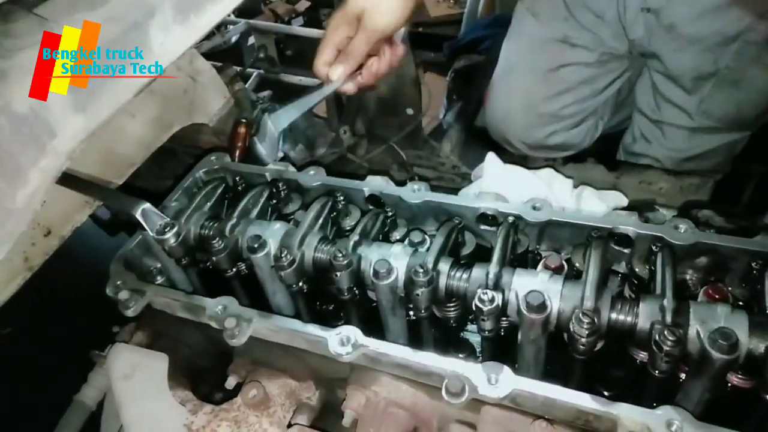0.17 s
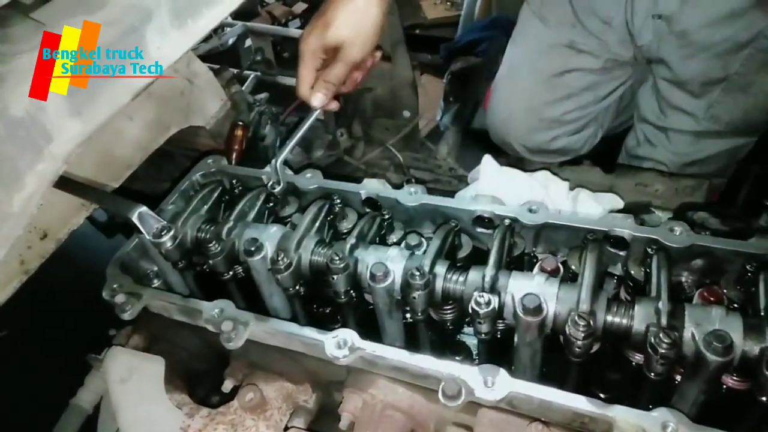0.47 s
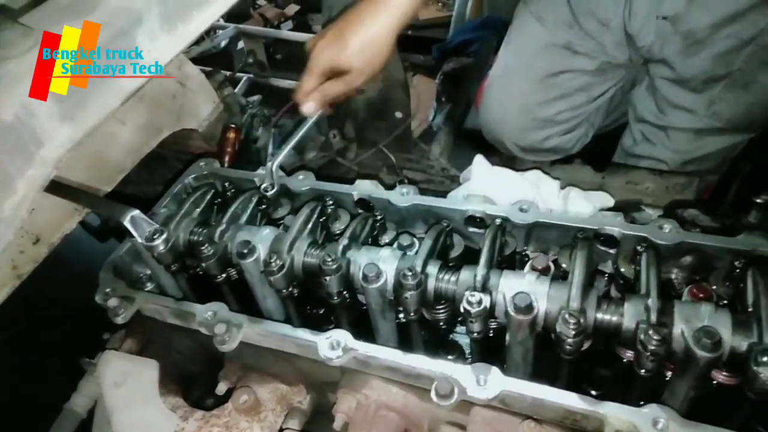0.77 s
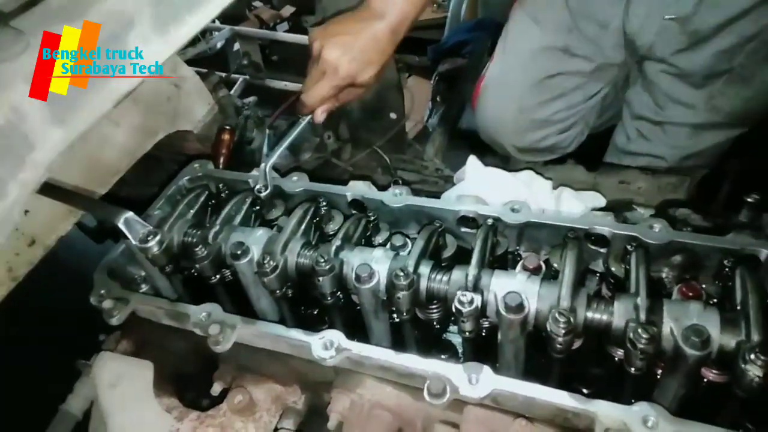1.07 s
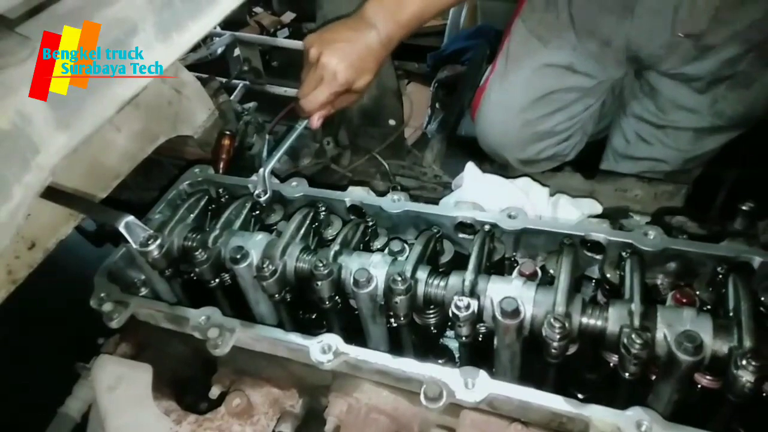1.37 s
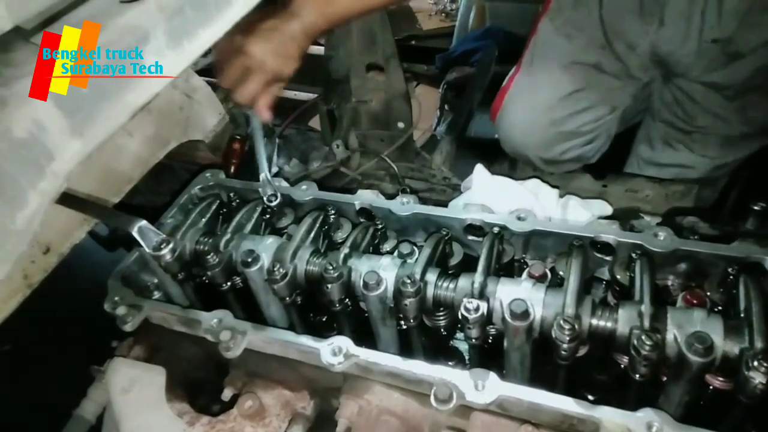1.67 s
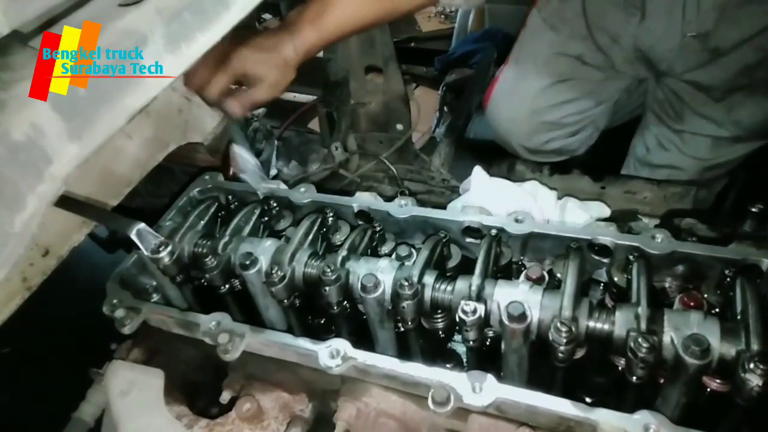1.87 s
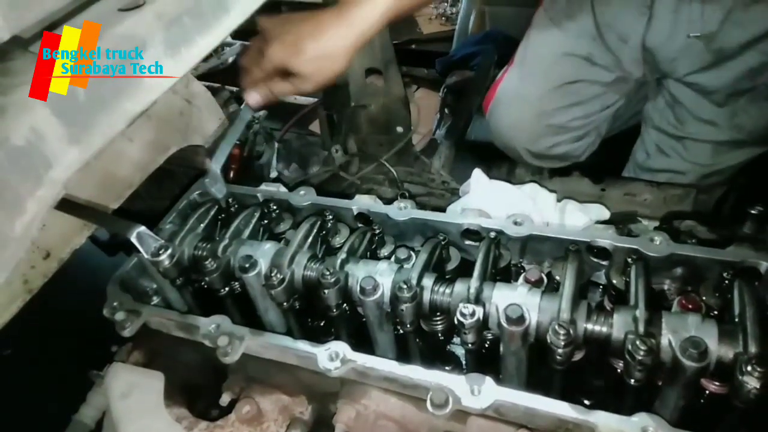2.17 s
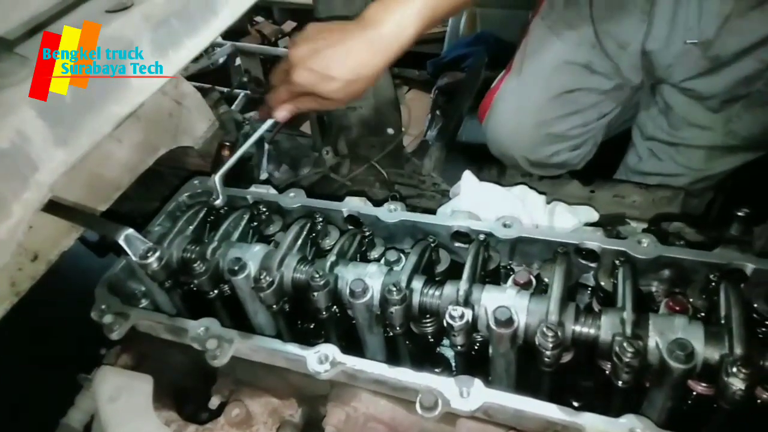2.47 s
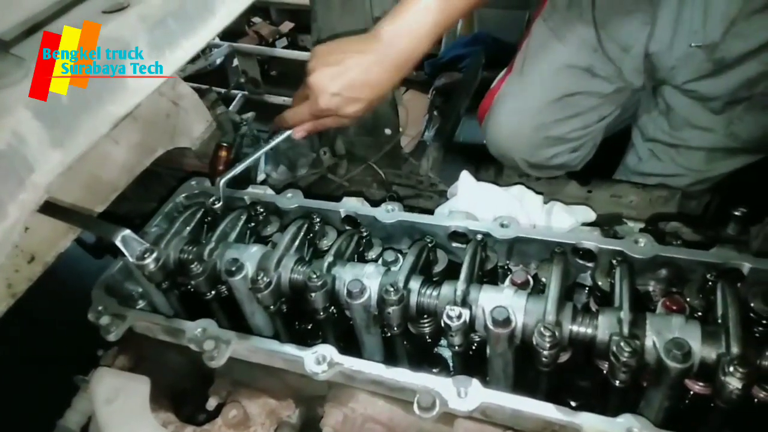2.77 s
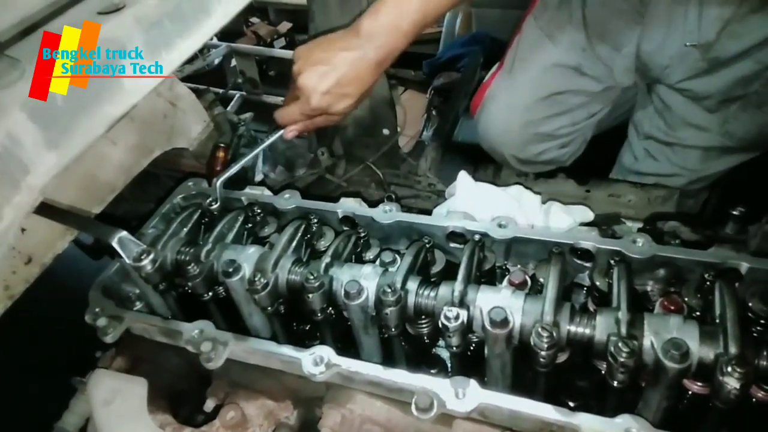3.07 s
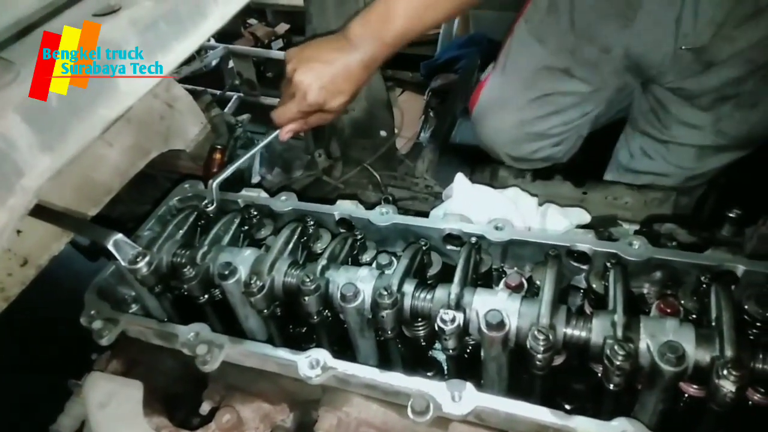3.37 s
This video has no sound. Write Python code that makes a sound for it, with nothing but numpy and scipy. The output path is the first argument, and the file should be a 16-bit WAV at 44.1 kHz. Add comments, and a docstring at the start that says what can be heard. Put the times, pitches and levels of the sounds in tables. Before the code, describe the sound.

Light metal clinks of a wrench on an engine, with machinery humming and hissing behind.

```python
"""From the start a workshop machine runs at a steady speed, with the same rattle every turn and a gear
whine, over a mains hum, a low hum that swells and fades, and a broad hiss of air and traffic.
At 0.4 s a steel wrench is set on the nuts of a stopped engine and clinks: wrench and engine block ring.
Near 1 s it takes the load with a dull knock, and a nut squeaks faintly as it gives.
A deeper hum comes in at 1.75 s and dies away; from 2.3 s the wrench clinks again."""
import sys
import numpy as np
from scipy import signal
from scipy.fft import rfft, irfft
from scipy.io import wavfile

SR = 44100
rng = np.random.default_rng(int(sys.argv[2]) if len(sys.argv) > 2 else 0)


def dump(signal):
    """Clip the signal to [-1, 1] and save it as 16-bit WAV at the path in sys.argv[1]."""
    limited = np.clip(np.atleast_2d(signal).T, -1, 1)
    pcm = np.round(limited * 32767).astype(np.int16)
    wavfile.write(sys.argv[1], SR, pcm)


N = 155232

# Typical strength of the rattle's overtones (multiples of the turn rate): (frequency [Hz], level [dB])
RATTLE_SPECTRUM = [(25, -64.5), (110, -68), (220, -66), (350, -69), (430, -85.5), (560, -62.5), (700, -72),
                   (860, -64.5), (1100, -74), (1350, -67), (1700, -102), (2700, -84.5), (3500, -82),
                   (4200, -81.5), (4900, -80), (6700, -103), (8500, -101), (11000, -115)]
# Overtones that stand out as clear tones: {multiple of the turn rate: level [dB]}
MACHINE_TONES = {2: -61, 3: -62, 23: -65, 39: -55, 40: -61, 47: -62, 61: -63, 62: -61, 73: -56, 74: -53.5,
                 75: -60, 79: -64, 84: -63, 90: -64, 246: -75, 253: -74, 263: -76, 268: -75, 306: -74, 318:
                 -76, 344: -77, 352: -78, 359: -76, 374: -76}
# The low hum that swells and fades: (time [s], frequency [Hz], level [dB])
SWELL_PATH = [(0, 104, -50), (.03, 104.5, -45), (.15, 103.2, -58), (.58, 98.2, -66), (.72, 93.6, -44.5),
              (1.1, 100.6, -47), (1.4, 92.1, -52), (1.48, 94.5, -59), (1.66, 102.5, -47), (1.74, 97.9, -50),
              (1.82, 94, -52), (1.95, 96.6, -60)]
# The mains hum and three higher steady tones: (frequency [Hz], level [dB])
HUM_TONES = [(60, -52), (209.6, -63), (495.6, -64), (1394.6, -62)]
# The hiss from bass to treble: (frequency [Hz], level [dB per Hz])
HISS_SPECTRUM = [(20, -68), (45, -79), (70, -71), (130, -74), (200, -73.5), (330, -83), (480, -77.5),
                 (690, -79), (880, -76.5), (1080, -76), (1400, -80.5), (1700, -83.5), (2200, -82.5),
                 (2700, -91), (4300, -94.5), (6700, -93.5), (8500, -103), (10600, -105), (13400, -104.5),
                 (15500, -100)]
# How the bass of the hiss rises and falls: (time [s], gain [dB])
HISS_BASS_GAIN = [(0, 1.5), (.4, -1.5), (1.0, -1.5), (1.8, 0), (2.6, -2), (3.5, -2)]
# One row a clink: (time [s], overall gain [dB], 2 gains for the block's groups of notes [dB],
# 9 gains for the wrench's groups [dB], time the wrench rings freely [s], gain of the crack [dB])
CLINK_BLOWS = [(0.4082, -30, -13, -9.5, -16, -16, -18, -22, -17, -26, -24, -17, -22, 0.02, -5),
               (0.4135, -28, -20, -16, -15.5, -17, -18, -28, -22, -26, -26, -14, -19, 0.016, -12),
               (0.4352, -33.5, -15, -16, -7.5, -19, -14, -20, -21, -30, -20, -26, -22, 0.0065, -16),
               (0.4424, -35.5, -18, -10, -5.5, -18, -20, -24, -21, -30, -13, -26, -22, 0.0078, -22),
               (0.4674, -38, 3, -13, -18, -17, -22, -26, -24, -28, -24, -21, -15, 0.021, -16),
               (0.4944, -44, -17, -7, -14, -9, -28, -28, -28, -28, -26, -23, -25, 0.012, -18),
               (0.6646, -38, -2, -12, -11, -12, -16, -10, -24, -12, -15, -10, -14, 0.011, -10),
               (2.3086, -35.5, 1, -5, -12.5, -21, -30, -32, -15, -30, -32, -26, -16, 0.018, -8.5),
               (2.3714, -29, -12, -9.5, -15, -20, -15, -30, -29, -28, -26, -11, -20, 0.012, -12),
               (2.3834, -38, -4, -3, -12, -14, -22, -26, -22, -24, -26, -22, -8, 0.019, -12),
               (2.577, -33, -7.5, -19, -15, -11, -26, -30, -28, -19, -24, -28, -8, 0.0058, -10),
               (2.586, -38.5, -4, -12, -16, -9, -26, -30, -28, -20, -24, -26, -16, 0.0083, -12)]
# Notes the engine block rings at, a low and a high group: (frequency [Hz], gain [dB], ring time [s])
BLOCK_NOTES = [
    [(1250, -7, .025), (1450, -6, .025), (1700, -6, .02), (1950, -5, .02), (2330, -4, .022)],
    [(2710, -4, .035), (3000, -6, .02), (3270, -4, .04), (3480, -5, .03), (3800, -3, .045),
     (4150, -5, .015), (5000, -6, .02), (5300, -6, .015)],
]
# Notes the wrench rings at, in nine groups from low to high: (frequency [Hz], gain [dB], ring time [s])
WRENCH_NOTES = [
    [(6335, -1, .11), (6490, -3, .11)],
    [(5820, -2, .09), (6690, -3, .05), (6890, -1, .05), (7200, -5, .04)],
    [(9085, -1, .1), (8460, -8, .05)],
    [(9680, -1, .06)],
    [(11650, -1, .11)],
    [(12050, -1, .06)],
    [(13440, -1, .05)],
    [(14080, -1, .09)],
    [(15380, -1, .08)],
]
# Notes of the dull knock: (frequency [Hz], gain [dB], ring time [s])
KNOCK_NOTES = [(720, -6, .05), (1050, -1, .04), (1650, -4, .03), (2150, -6, .03)]
# The squeak's three gliding tones, a list for each: (time [s], frequency [Hz], level of a strand [dB])
SQUEAK_PATHS = [
    [(1.05, 13800, -88), (1.065, 14150, -70), (1.1, 14950, -73), (1.14, 15300, -71), (1.2, 15300, -88),
     (1.25, 14550, -71), (1.29, 15200, -75), (1.33, 15000, -75), (1.36, 14100, -72), (1.39, 13550, -70),
     (1.41, 12400, -68), (1.42, 12100, -90)],
    [(1.06, 12900, -90), (1.11, 13150, -78), (1.16, 13300, -73), (1.185, 13900, -75), (1.23, 13650, -72),
     (1.27, 13400, -76), (1.3, 14000, -80), (1.335, 14300, -71), (1.36, 13200, -74), (1.395, 12350, -72),
     (1.41, 12200, -90)],
    [(1.21, 10500, -92), (1.226, 10450, -68), (1.245, 10350, -72), (1.26, 10200, -88), (1.29, 10150, -76),
     (1.325, 10750, -75), (1.36, 10600, -88)],
]

TURN_HZ, CUTOFF_HZ = 13.918, 15520   # machine turns per second; top edge of the treble


def from_db(db):
    """Turn decibels into a number to multiply by."""
    return 10 ** (np.asarray(db, float) / 20)


def level_at(spectrum, hz):
    """Read the level in dB between a spectrum's points, on a log-frequency axis."""
    points_hz, points_db = np.transpose(spectrum)
    return np.interp(np.log(hz + 1), np.log(points_hz), points_db)


def drift(rate_hz):
    """A smooth random wobble, about 1 in size; a higher rate wobbles faster."""
    step, warm_up = 40, 4000   # one random value every 40 samples
    pole = np.exp(-2 * np.pi * step * rate_hz / SR)
    noise = rng.standard_normal(N // step + warm_up + 2)
    slow = signal.lfilter([1], [1, -2 * pole, pole * pole], noise)[warm_up:]
    return np.interp(np.arange(N) / step, np.arange(len(slow)), slow / np.sqrt(np.mean(slow ** 2)))


def tone(hz, db):
    """A sine wave at an average (rms) level; pitch and level may move."""
    cycles = rng.random() + np.cumsum(hz * np.ones(N)) / SR
    return np.sqrt(2) * from_db(db) * np.sin(2 * np.pi * cycles)


def ring(clicks, hz, ring_s):
    """Each click starts a note that fades by 60 dB over its ring time."""
    decay, angle = from_db(-60 / (ring_s * SR)), 2 * np.pi * hz / SR
    return signal.lfilter([0, np.sin(angle)], [1, -2 * decay * np.cos(angle), decay ** 2], clicks + 1e-18)


def machine(size=2 ** 15, wander_s=.00002):
    """A machine repeats one turn of random rattle, almost in strict time; its gears whine along."""
    multiples = np.arange(size // 2 + 1)
    hz = multiples * TURN_HZ
    overtones = from_db(level_at(RATTLE_SPECTRUM, hz)) * np.sqrt(rng.exponential(1, len(hz)))
    overtones *= (hz > 0) & (hz < CUTOFF_HZ)
    overtones[list(MACHINE_TONES)] = from_db(list(MACHINE_TONES.values()))
    one_turn = irfft(overtones * np.exp(2j * np.pi * rng.random(len(hz)))) * size / np.sqrt(2)
    turns = (np.arange(N) / SR + wander_s * drift(2.1)) * TURN_HZ
    return np.interp(turns * size, np.arange(size), one_turn, period=size) + gear_whine(turns)


def gear_whine(turns, cycles_per_turn=331.7, level_db=-64.5, flutter_db=3):
    """Gears whine unsteadily; the pitch swings once a turn and the level dips where it is highest."""
    swing = 2 * np.pi * (turns - .8)   # highest at 0.8 of each turn
    phase = 2 * np.pi * (cycles_per_turn * turns + rng.random())
    warble = 4.6 * np.sin(swing) + .6 * drift(20)   # radians
    dip = 1 - .1 * np.cos(swing)
    return np.sqrt(2) * from_db(level_db + flutter_db * drift(30)) * dip * np.sin(phase + warble)


def swelling_hum(fade_s=.05):
    """A low hum wanders in pitch, swells and fades, and is gone just before 2 s."""
    t = np.arange(N) / SR
    times, hz, db = np.transpose(SWELL_PATH)
    return tone(np.interp(t, times, hz), np.interp(t, times, db)) * np.clip((times[-1] - t) / fade_s, 0, 1)


def steady_hums():
    """The mains hum and three higher tones hold their pitch and level."""
    return sum(tone(hz, db) for hz, db in HUM_TONES)


def hiss(waver_db=.5):
    """Air and traffic hiss; each octave wavers by itself, and the low ones also rise and fall together."""
    hz = np.arange(N // 2 + 1) * SR / N
    spectrum = rfft(rng.standard_normal(N)) * from_db(level_at(HISS_SPECTRUM, hz)) * np.sqrt(SR / 2)
    bass_db = np.interp(np.arange(N) / SR, *np.transpose(HISS_BASS_GAIN))
    out = np.zeros(N)
    for octave in range(3, 16):   # each band is centred on 2 ** octave Hz
        band = irfft(spectrum * np.clip(1 - abs(np.log2(hz + 1) - octave), 0, 1), N)
        out += band * from_db(waver_db * drift(6) + bass_db * (2 ** octave < 400))
    return out


def block_chatter(t, free_s, groups_db, touches_per_s=6200, touches_db=3, gain_db=-4):
    """The engine block rings from the blow and from many tiny touches while the wrench is loose."""
    touches = (rng.random(len(t)) < touches_per_s / SR) * rng.standard_normal(len(t))
    touches *= np.clip(1 - t / free_s, 0, 1) ** .5
    force = 1. * (t == 0) + from_db(touches_db) * touches / np.linalg.norm(touches)
    return sum(ring(force, hz, ring_s) * from_db(gain_db + group_db + db) * rng.choice([-1, 1])
               for group, group_db in zip(BLOCK_NOTES, groups_db) for hz, db, ring_s in group)


def wrench_ring(t, groups_db, gain_db=1, spread_db=4.5):
    """One blow sets the steel wrench ringing, with a slightly different mix of notes each time."""
    blow, out = 1. * (t == 0), np.zeros(len(t))
    for group, group_db in zip(WRENCH_NOTES, groups_db):
        for hz, db, ring_s in group:
            note_db = gain_db + group_db + db + spread_db * rng.uniform(-1, 1)
            out += ring(blow, hz, ring_s) * from_db(note_db) * rng.choice([-1, 1])
    return out


def clinks(rise_s=.0015, grip_db=-11, grip_s=.003, crack_s=.075, room_db=-23, room_s=.35):
    """Wrench hits nut: both block and wrench ring, with a crack of noise and a soft tail from the room."""
    t = np.arange(SR // 2) / SR
    out = np.zeros(N + len(t))
    crack_band = signal.butter(1, [1300, 8400], "band", fs=SR, output="sos")
    for time_s, level_db, low_db, high_db, *wrench_db, free_s, crack_db in CLINK_BLOWS:
        block = block_chatter(t, free_s, (low_db, high_db))
        wrench = wrench_ring(t, wrench_db)
        noise = signal.sosfilt(crack_band, rng.standard_normal(len(t)))
        crack = noise * from_db(crack_db - 60 * t / crack_s)
        room = noise * from_db(room_db - 60 * t / room_s)
        # Holding the wrench against the nut quickly muffles it.
        grip = from_db(grip_db * np.clip((t - free_s) / grip_s, 0, 1))
        clink = (block + grip * (wrench + crack) + room) * np.clip(t / rise_s, 0, 1)
        start = int(time_s * SR)
        out[start:start + len(t)] += from_db(level_db) * clink
    return out[:N]


def knock(time_s=.9645, gain_db=-35):
    """The wrench takes the load: one soft blow rings a few short, low notes."""
    blow = 1. * (np.arange(N) == int(time_s * SR))
    return sum(ring(blow, hz, ring_s) * from_db(gain_db + db) for hz, db, ring_s in KNOCK_NOTES)


def squeak(strands=2, roughness=.01, flutter_db=3):
    """The nut squeaks as it gives; each tone is made of strands that tremble in pitch and level."""
    t, out = np.arange(N) / SR, np.zeros(N)
    for times, hz, db in map(np.transpose, SQUEAK_PATHS * strands):
        pitch = np.interp(t, times, hz) * (1 + roughness * drift(110))
        level_db = np.interp(t, times, db, left=-150, right=-150) + flutter_db * drift(60)
        out += tone(pitch, level_db)
    return out


def deep_hum(start_s=1.75, hz=69.6, level_db=-46.5, rise_s=.048, ring_s=3.2):
    """A deeper hum comes in quickly and dies away."""
    age = np.arange(N) / SR - start_s
    return tone(hz, level_db - 60 * age / ring_s) * np.clip(age / rise_s, 0, 1)


def scene():
    """Add the workshop and the wrench work together in one channel."""
    workshop = machine() + swelling_hum() + deep_hum() + steady_hums() + hiss()
    return (workshop + clinks() + knock() + squeak())[None]


def record(dry):
    """A steep filter cuts off the highest treble."""
    return signal.sosfilt(signal.ellip(12, .5, 45, CUTOFF_HZ, fs=SR, output="sos"), dry)


dry = scene()
out = record(dry)
dump(out)
```